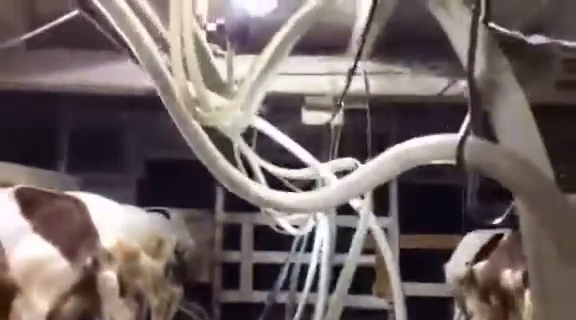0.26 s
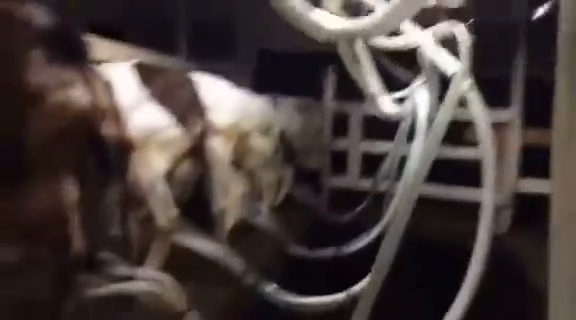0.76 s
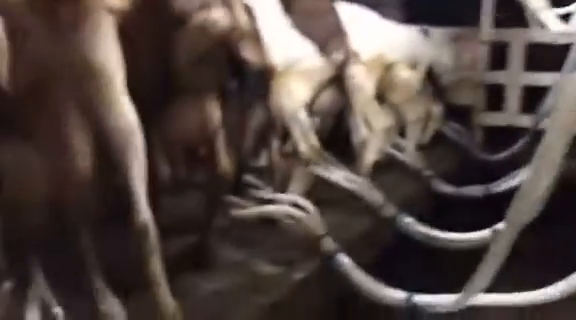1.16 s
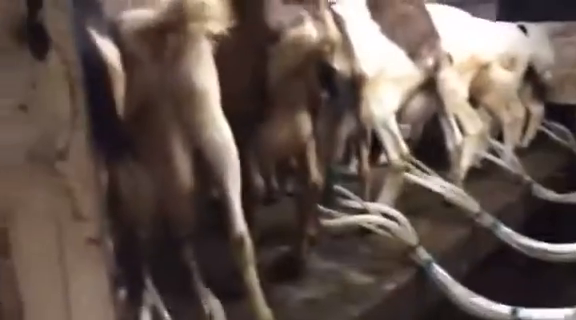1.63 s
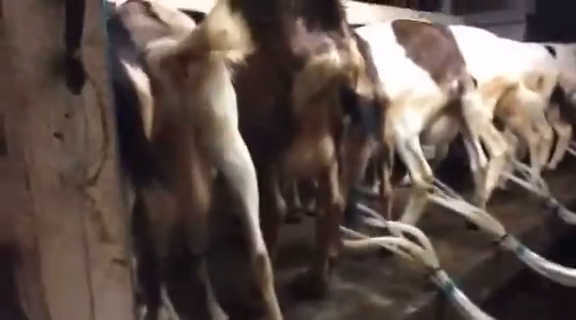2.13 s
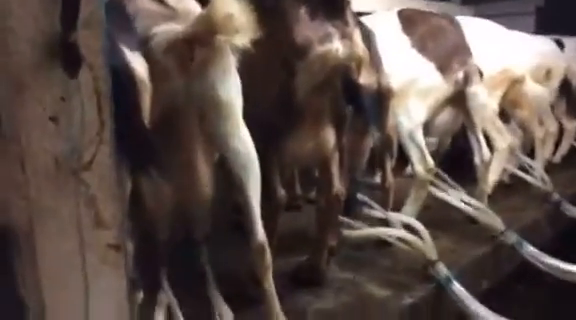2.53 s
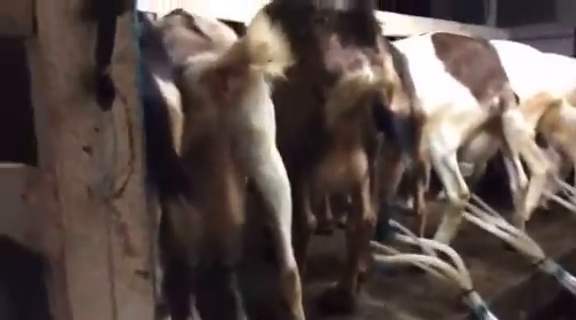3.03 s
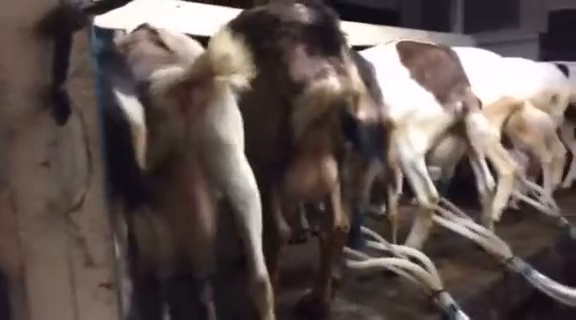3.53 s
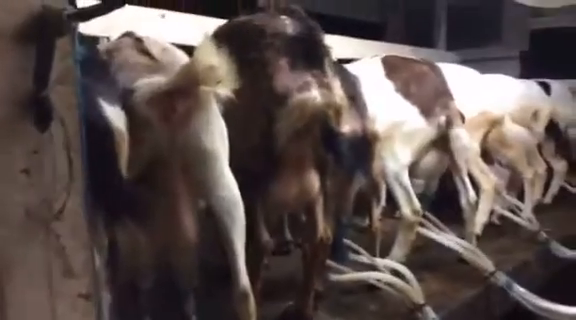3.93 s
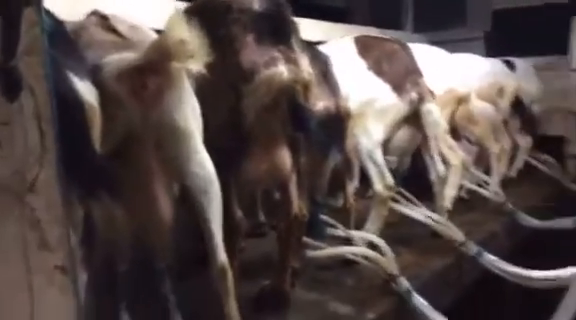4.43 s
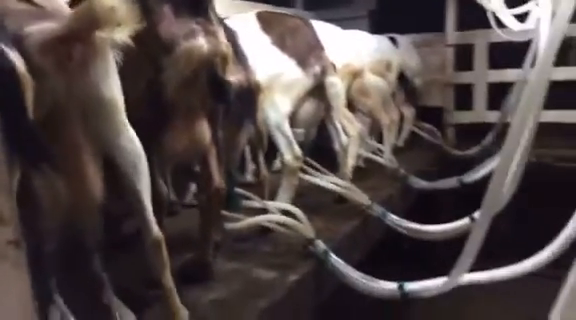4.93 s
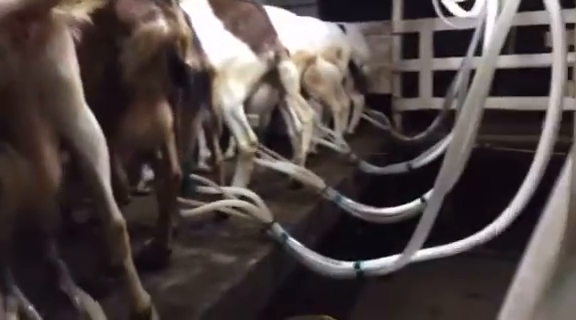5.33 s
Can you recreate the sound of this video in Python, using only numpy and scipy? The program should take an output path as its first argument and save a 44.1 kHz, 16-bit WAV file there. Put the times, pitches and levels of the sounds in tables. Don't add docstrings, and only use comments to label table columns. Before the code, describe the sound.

A milking pulsator ticks and tocks in a rapid, even rattle of about ten clicks a second over steady airy hiss in a barn.

```python
import sys
import numpy as np
from scipy import signal
from scipy.fft import rfft, irfft, next_fast_len
from scipy.io import wavfile
from scipy.ndimage import uniform_filter1d, minimum_filter1d, map_coordinates

SR = 44100
rng = np.random.default_rng(int(sys.argv[2]) if len(sys.argv) > 2 else 0)


def waveform_to_disk(signal):
    frames = np.transpose(np.atleast_2d(signal))
    scaled = np.clip(frames, -1, 1) * 32767
    samples = np.round(scaled).astype(np.int16)
    wavfile.write(sys.argv[1], SR, samples)


def attenuation_scalar(level_db):
    decades = np.asarray(level_db, float) / 20
    return 10 ** decades


N = 246332


def unit(x):
    return x / np.sqrt(np.mean(x ** 2) + 1e-20)


def wobble(rate):
    knots = rng.standard_normal(int(N * rate / SR) + 4)
    return map_coordinates(knots, [np.arange(N) * rate / SR])


def coloured(x, spectrum):
    m = next_fast_len(N + 8192)
    hz, db = np.transpose(spectrum)
    log_hz = np.log(np.fft.rfftfreq(m, 1 / SR) + 1)
    gain = attenuation_scalar(np.interp(log_hz, np.log(hz), db))
    return irfft(rfft(x, m) * gain, m)[:N]


def air(spectrum, patchy_db, grain_db):
    z = signal.stft(rng.standard_normal(N), nperseg=512)[2]
    field = uniform_filter1d(rng.standard_normal(z.shape), size=5, axis=0)
    field = uniform_filter1d(field, size=6, axis=1)
    x = signal.istft(z * attenuation_scalar(patchy_db * unit(field)), nperseg=512)[1][:N]
    fluttering = x * attenuation_scalar(grain_db * wobble(300))
    return unit(coloured(fluttering, [(7.2, -120)] + list(spectrum) + [(20000, -120)]))


def train(times, dbs, shape):
    x = np.zeros(N)
    x[np.clip((np.asarray(times) * SR).astype(int), 0, N - 1)] = attenuation_scalar(np.asarray(dbs))
    return signal.fftconvolve(x, shape)[:N]


def ring(t, hz, t60, attack):
    t = np.maximum(t, 0)
    return np.sin(2 * np.pi * hz * t) * attenuation_scalar(-60 * t / t60) * (1 - np.exp(-t / attack))


def slide(strokes, modes, echoes, onset, wet_db, barn_t60):
    out, t = np.zeros(N + SR), np.arange(SR // 5) / SR
    highpass = signal.butter(2, 500, "high", fs=SR, output="sos")
    for s, blow_db, barn_db, *_ in strokes:
        blow = np.zeros(1000)
        for hz, db, t60, sign in modes:
            blow += attenuation_scalar(db + rng.normal(0, .8)) * sign * ring(t[:1000], hz, t60, .0002)
        blow = signal.sosfilt(highpass, blow)
        blow *= attenuation_scalar(blow_db) / np.abs(blow).max()
        paths = np.zeros(SR // 50)
        paths[0] = 1
        for delay, db in echoes:
            paths[int(delay * SR)] += attenuation_scalar(db + rng.normal(0, 1.7))
        crack = blow * attenuation_scalar(-60 * t[:1000] / .007)
        buildup = np.clip(t / 0.0038 - .3, 0, 1)
        scatter = attenuation_scalar(-60 * t / barn_t60) * buildup * rng.standard_normal(len(t))
        heard = attenuation_scalar(barn_db + wet_db) * signal.fftconvolve(scatter, crack / np.linalg.norm(crack))
        heard[:len(blow) + len(paths) - 1] += signal.fftconvolve(blow, paths)
        out[max(int((s - onset) * SR), 0):][:len(t)] += heard[:len(t)]
    return out[:N]


# (frequency [Hz], density [dB per Hz])
VENT_BODY = [(700, -20.5), (1100, -36.5), (1600, -15), (2200, -6.5), (3400, -7), (4200, -9), (5500, -23)]
VENT_HISS = [(3500, -40.5), (4500, -5), (5300, -5.5), (6000, 0.5), (6600, -8.5), (8300, -13), (9000, -15),
             (9700, -28.5)]


def vents(strokes, lead):
    s, _, _, body_db, hiss_db = np.transpose(strokes)
    t = np.arange(SR // 8) / SR
    body_shape = (1 - np.exp(-t / 0.0076)) * np.exp(-t / 0.047)
    hiss_shape = (1 - np.exp(-(t / 0.0067) ** 2)) * np.exp(-t / 0.031)
    body = train(s - lead, body_db - .5, body_shape)
    hiss = train(s - lead, hiss_db + 4.0, hiss_shape)
    low_jet = body * air(VENT_BODY, patchy_db=1.3, grain_db=2)
    return low_jet + hiss * air(VENT_HISS, patchy_db=1.8, grain_db=2)


# (time [s], tick peak [dB], tock peak [dB], vent level [dB])
CYCLES = [(0.0, -2, -8.5, -33), (0.201, -1.5, -8.5, -24.5), (0.402, -5.5, -7.5, -22.5),
          (0.6031, -3, -11, -24.5), (0.8038, -2, -11, -27), (1.0044, -2.5, -10, -27),
          (1.2055, -4, -12, -26.5), (1.4065, -4, -10, -27), (1.6068, -5, -11, -27.5),
          (1.8077, -3.5, -13.5, -26.5), (2.008, -4, -10.5, -27.5), (2.2079, -3.5, -8.5, -29.5),
          (2.409, -6, -10.5, -26), (2.6091, -7.5, -10, -24), (2.8103, -4.5, -11, -25),
          (3.0111, -5.5, -9.5, -24.5), (3.2101, -7, -9, -24.5), (3.4113, -5, -13, -26),
          (3.6121, -4.5, -12, -26), (3.8124, -4.5, -12.5, -24.5), (4.0131, -2.5, -11, -25.5),
          (4.2146, -4, -13.5, -24.5), (4.4149, -5.5, -11, -25.5), (4.6154, -5.5, -10, -27.5),
          (4.8163, -3.5, -12, -27.5), (5.0176, -6, -12, -26), (5.2187, -7, -10.5, -27.5),
          (5.42, -5.5, -11, -27)]


def valve_strokes():
    tock_after_s = .0985
    stroke_scatter_db = 1.5
    s, tick_db, tock_db, vent_db = np.transpose(CYCLES)
    chance = stroke_scatter_db * rng.standard_normal((len(s), 5)).T
    ticks = [s, tick_db, tick_db - 21.5 + chance[0], vent_db, vent_db - 2 + chance[1]]
    tocks = [s + tock_after_s, tock_db, tock_db - 11 + chance[2],
             vent_db - 3.5 + chance[3], vent_db - 5 + chance[4]]
    return np.transpose(ticks), np.transpose(tocks)


# (frequency [Hz], level [dB], t60 [s], polarity [+1 or -1])
TICK_MODES = [(1220, -26, .016, -1), (1840, -19, .016, -1), (2510, -1.5, .004, 1), (2880, -4, .01, 1),
              (3340, -1, .008, -1), (4100, 0, .003, -1), (5230, -8, .004, 1), (5840, -17, .012, -1),
              (7750, -4, .004, 1)]
# (delay [s], level [dB])
TICK_ECHOES = [(.0023, -14), (.0039, -12), (.0056, -17)]


def tick(strokes):
    blows = slide(strokes, TICK_MODES, TICK_ECHOES, onset=.0002, wet_db=-0.5, barn_t60=0.14)
    return blows + vents(strokes, lead=.034)


# (frequency [Hz], level [dB], t60 [s], polarity [+1 or -1])
TOCK_MODES = [(480, -29, .015, 1), (1250, -14, .008, -1), (2810, -16, .015, 1), (3330, -7, .013, 1),
              (3780, -1, .006, -1), (4890, -4, .004, 1), (5480, -4, .008, -1), (6120, -19, .016, 1),
              (7350, -11, .003, -1)]
# (delay [s], level [dB])
TOCK_ECHOES = [(.0022, -12), (.0042, -8), (.0065, -12), (.0102, -16)]


def tock(strokes):
    blows = slide(strokes, TOCK_MODES, TOCK_ECHOES, onset=.00035, wet_db=1.0, barn_t60=0.1)
    return blows + vents(strokes, lead=.038)


# (time [s], peak level [dB], ring frequency [Hz])
FAR_BLOWS = [(0.1164, -19.5, 3500), (0.5247, -16.5, 3580), (0.7392, -28, 3520), (0.9792, -18, 3300),
             (1.3934, -23, 3050), (1.5808, -19.5, 2510), (2.1174, -24.5, 3310), (2.145, -21, 3400),
             (2.4618, -21, 3650), (2.7134, -25, 3430), (2.9534, -22, 3440), (3.2979, -21.5, 3300),
             (3.5384, -21, 3630), (3.7174, -19.5, 3600), (4.3755, -21, 3740), (4.3994, -17, 2860),
             (4.4687, -24.5, 3350), (4.8569, -15.5, 3440), (4.9926, -28, 3450)]


def far_valves():
    out, t = np.zeros(N + SR), np.arange(SR // 10) / SR
    first_s, period_s = .3733, .3884
    beats = np.arange(first_s, N / SR, period_s)
    neighbour = [(s, -17 - 0.64 * s, 3494) for s in beats]
    for s, db, hz in neighbour + list(FAR_BLOWS):
        paths = attenuation_scalar(-14.0 - 60 * t / 0.13) * rng.standard_normal(len(t))
        paths[0] = 1
        blow = ring(t, hz, 0.0072, 0.00039) + 0.29 * ring(t, 1.5 * hz, 0.0018, 0.00038)
        out[int(s * SR):][:len(t)] += attenuation_scalar(db - 1.5) * signal.fftconvolve(paths, blow)[:len(t)]
    return out[:N]


# (frequency [Hz], density [dB per Hz])
FAR_AIR = [(530, -46), (900, -21.5), (1130, -12), (1610, -18), (1910, -11), (2610, -6), (3460, 0),
           (4110, -6.5), (5790, -5), (7900, -11.5), (8480, -13.5), (9100, -19), (9700, -25)]
# (frequency [Hz], density [dB per Hz])
RUSH = [(15, -49.5), (25, -18.5), (85, -2), (168, -3.5), (332, -8.5), (630, -10.5), (961, -9), (1130, -2.5),
        (1610, -5.5), (2000, -3), (2600, -16), (4400, -120)]
# (frequency [Hz], width [Hz], level over the hiss [dB])
PORTS = [(1113, 60, -9.5), (1450, 68, 5), (3610, 81, -8), (3990, 29, -20), (6000, 130, -22.5)]
# (time [s], level [dB])
LINE = [
    (0.0, -28.5),
    (0.46, -30.5),
    (0.7, -29),
    (2.2, -28),
    (2.6, -29),
    (3.78, -28.5),
    (4.06, -30),
    (4.35, -29),
    (5.59, -28.5),
]


def line():
    s, far_db = np.transpose(LINE)
    flow_db = np.interp(np.arange(N) / SR, s, far_db)
    blend = air(FAR_AIR, patchy_db=2.0, grain_db=2.5)
    for hz, width_hz, db in PORTS:
        blend = blend + attenuation_scalar(db) * signal.lfilter(*signal.iirpeak(hz, hz / width_hz, SR), blend)
    hiss = attenuation_scalar(flow_db - 2.0 + 1.45 * wobble(25)) * unit(blend)
    rush = attenuation_scalar(flow_db - 14.5 + 0.73 * wobble(11)) * air(RUSH, patchy_db=1.0, grain_db=2.3)
    return hiss + rush


# (frequency [Hz], rms level [dB])
PUMP = [(80.7, -57), (161.5, -59), (242.2, -63), (479, -64), (602, -71.5)]


def pump():
    t = np.arange(N) / SR
    hum = np.zeros(N)
    for hz, db in PUMP:
        level = attenuation_scalar(db + 1.5 + 2.3 * wobble(6))
        hum += level * np.sin(2 * np.pi * hz * t + 1.01 * wobble(9))
    return hum


# (time [s], level [dB], frequency [Hz], t60 [s])
KNOCKS = [
    (0, -24.5, 182, 0.068),
    (0.641, -42, 391, 0.2),
    (1.7, -42, 354, 0.1),
]


def stall():
    t = np.arange(N) / SR
    return sum(attenuation_scalar(db) * ring(t - s, hz, t60, 0.0027) for s, db, hz, t60 in KNOCKS)


def scene():
    ticks, tocks = valve_strokes()
    near = tick(ticks) + tock(tocks)
    return (near + far_valves() + line() + pump() + stall())[None]


# (frequency [Hz], gain [dB])
MIC = [(8800, 0), (9300, -3), (9800, -8), (10000, -45), (16000, -70)]


def microphone(x):
    return coloured(x, MIC)


# (frequency [Hz], step against the frame's loudness [dB])
ROUNDING = [(100, -30), (1000, -14), (2000, -5), (3300, 0), (4200, 2.5), (6500, 2), (8000, -1), (9000, -3),
            (9600, -6), (16000, -6)]


def coarse_spectrum(x, size=1024, swing_db=3.6):
    n, k = np.arange(2 * size), np.arange(size)
    window = np.sin(np.pi * (n + .5) / (2 * size))
    basis = window[:, None] * np.cos(np.pi / size * np.outer(n + .5 + size / 2, k + .5))
    padded = np.pad(x, (size, 2 * size - N % size)).reshape(-1, size)
    lines = np.hstack([padded[:-1], padded[1:]]) @ basis
    hz, db = np.transpose(ROUNDING)
    loud = np.sqrt(np.mean(lines[:, :size // 2] ** 2, axis=1, keepdims=True))
    loud = minimum_filter1d(loud, size=3, axis=0)
    per_band = np.repeat(rng.standard_normal((len(lines), size // 8)), 8, axis=1)
    per_frame = rng.standard_normal((len(lines), 1))
    budget = 1.4 * per_band + 1.2 * per_frame
    budget[1::2] = budget[:len(lines) // 2 * 2:2]
    step_db = np.interp((k + .5) * SR / 2 / size, hz, db)
    step = loud * attenuation_scalar(step_db + swing_db * np.clip(budget, -3, 3.3))
    rounded = np.sign(lines) * np.floor(np.abs(lines) / step + .4) * step
    frames = rounded @ basis.T * 2 / size
    return (frames[1:, :size] + frames[:-1, size:]).ravel()[:N]


def roll_off(x):
    return signal.sosfilt(signal.butter(12, 15800, fs=SR, output="sos"), x)


def record(dry):
    x = coarse_spectrum(microphone(dry[0]))
    x = x / (1 + np.abs(x / .92) ** 10) ** (1 / 10)
    return roll_off(x[None])


dry = scene()
out = record(dry)
waveform_to_disk(out)
```